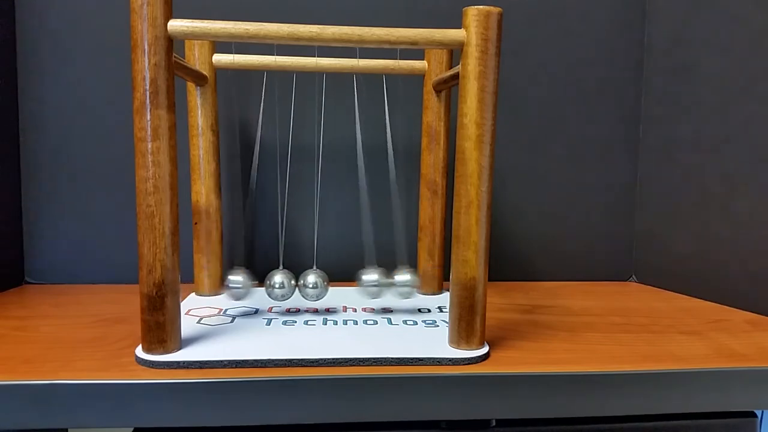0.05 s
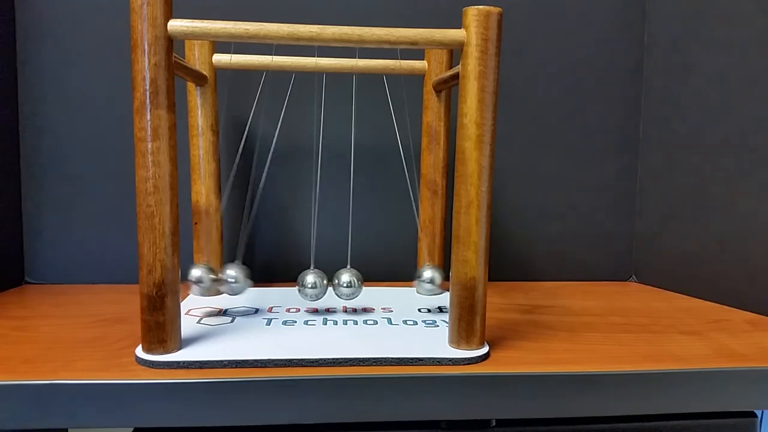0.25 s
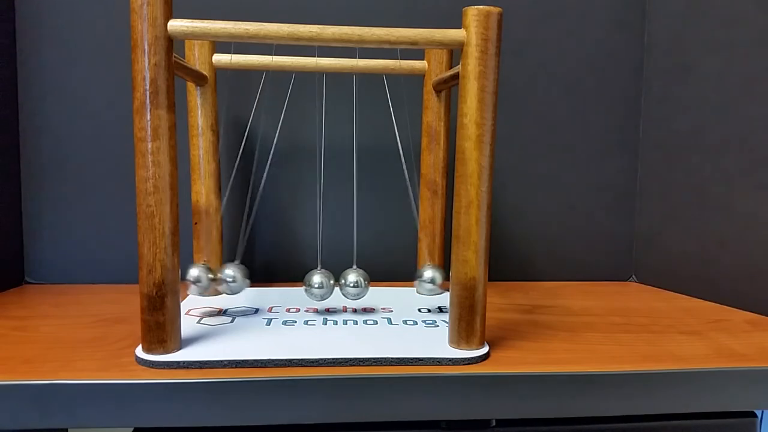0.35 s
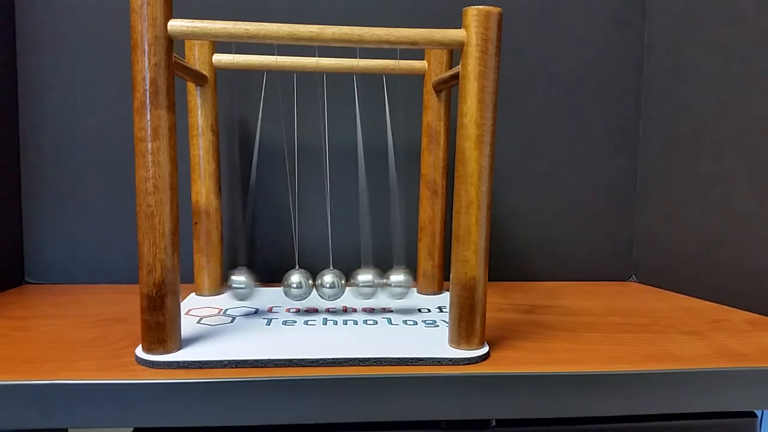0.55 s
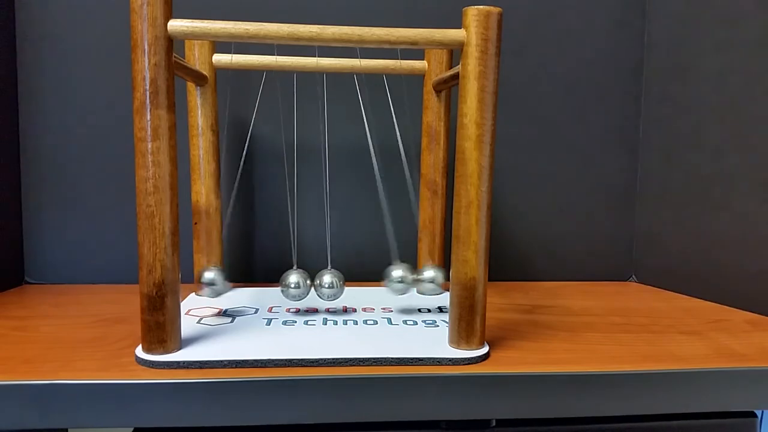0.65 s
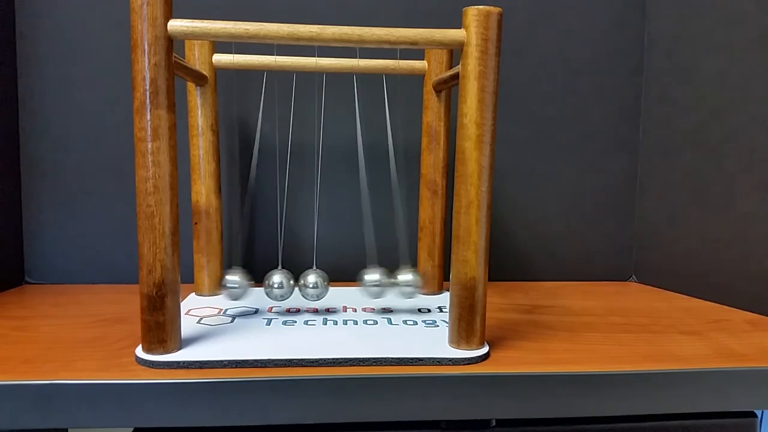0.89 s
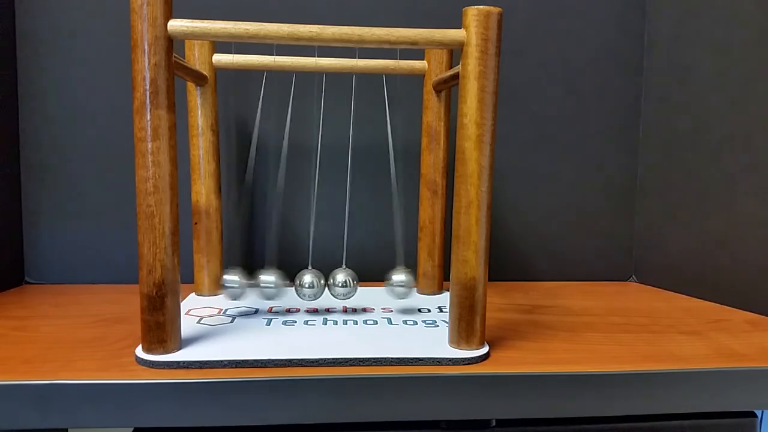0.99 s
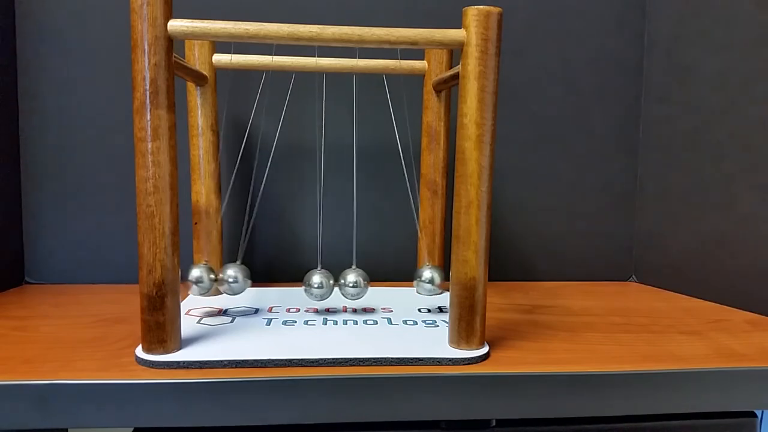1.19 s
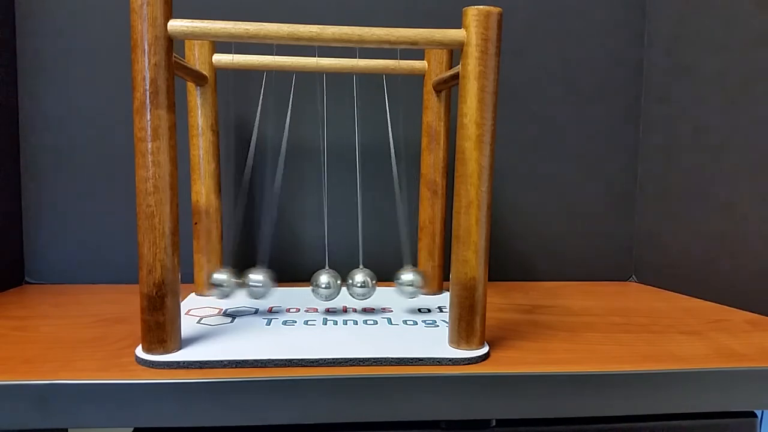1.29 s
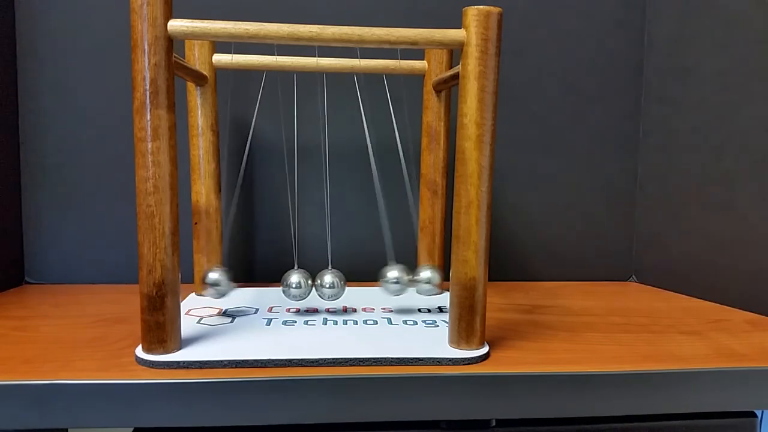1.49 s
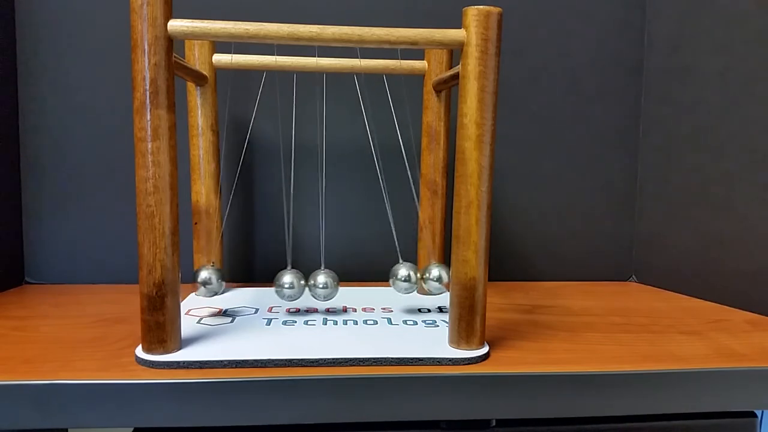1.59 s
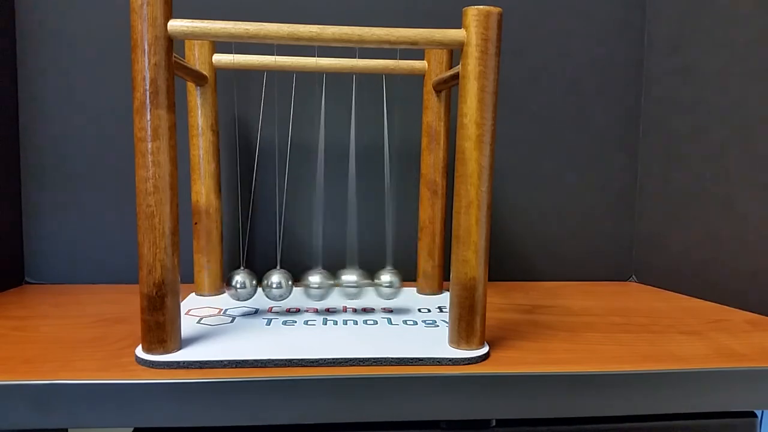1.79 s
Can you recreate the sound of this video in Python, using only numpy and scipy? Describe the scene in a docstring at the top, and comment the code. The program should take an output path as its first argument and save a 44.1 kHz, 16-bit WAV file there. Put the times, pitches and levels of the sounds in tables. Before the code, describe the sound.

A Newton's cradle swings on a desk, its steel balls making four regular bursts of three bright, briefly ringing clicks. The microphone is close, in a small room with short reverberation, a soft hum and slight hiss.

```python
"""A Newton's cradle swings on a desk in a small quiet room, heard close by over a low hum and faint hiss.
Its five steel balls are out of step: at 0.23 s come three quick clacks, each a few separate contacts.
Each contact sends out a sub-millisecond pulse, which balls and posts scatter and desk and frame reflect;
a brief ring and the room's short bright reverberation follow. Three more clacks come with every
half swing, about 0.42 s apart, the last group near 1.5 s."""
import sys
import numpy as np
from scipy import signal
from scipy.fft import rfft, irfft
from scipy.io import wavfile
from scipy.ndimage import uniform_filter1d

SR = 44100
rng = np.random.default_rng(int(sys.argv[2]) if len(sys.argv) > 2 else 0)


def generate_wav(signal):
    """Clip the signal to [-1, 1] and save it as 16-bit WAV at the path in sys.argv[1]."""
    frames = np.transpose(np.atleast_2d(signal))
    scaled = np.clip(frames, -1, 1) * 32767
    pcm = np.round(scaled).astype(np.int16)
    wavfile.write(sys.argv[1], SR, pcm)


N = 81585

CRADLE_GAIN_DB, TREBLE_EDGE_HZ, LEFT_LAG_MS = 9.5, 7050, 0.2474
SCATTER_GAIN_DB, SCATTER_T60_S, SCATTER_BUILD_S, SCATTER_LEAD_S = 2, 0.025, 0.00074, 0.001
ROOM_GAIN_DB, ROOM_T60_S, ROOM_TREBLE_T60_S, ROOM_BUILD_S = -3.5, 0.28, 0.25, 0.0032

# Ball-to-ball contacts: t/s, relative level/dB, treble gain/dB, room gain/dB
CONTACTS = [ (.228, -13, -4, -7), (0.2286, -12, -5.5, -8.5), (0.2535, -8, 1.5, 1), (.2542, -7.5, 1.5, 1.5),
            (0.2566, -15.5, -4, 2), (.2767, -10.5, 4, -1.5), (0.2776, -13, 1, -3.5), (0.2798, -14, 2, -4),
            (0.2806, -10.5, 1, -0.5), (0.6502, -11.5, -8, -6), (0.6528, -12.5, -6, -7),
            (0.6761, -13.5, 3, -4), (0.6762, -7.5, 2, -2.5), (0.6765, -9.5, 3.5, -3.5),
            (0.6994, -9.5, 2.5, 2), (0.7004, -11, 2, 1.5), (1.068, -13.5, -2.5, -5.5),
            (1.0717, -13.5, -8, -6), (1.0965, -8.5, 2, -0.5), (1.0985, -9, 1, -0.5), (1.1219, -11, 3, -0.5),
            (1.1243, -13.5, 1, -1), (1.1257, -11.5, 2.5, 0.5), (1.128, -13.5, 1, -0.5),
            (1.4896, -12.5, -7.5, -2.5), (1.4969, -11, -3.5, -4), (1.5191, -6.5, 2, -1),
            (1.521, -9, -1, -1.5), (1.5218, -12.5, -1, -3), (1.541, -12.5, 1, 0.5), (1.5458, -14.5, 4, 0),
            (1.5468, -10, 2, 1), (1.5508, -12, 1, 1.5)]
# Spectral envelope of a contact: f/Hz, left gain/dB, right gain/dB
CONTACT_SPECTRUM = [(300, -39, -41), (896, -28.5, -32.5), (1470, -28, -27), (1830, -19.5, -20.5),
                    (2280, -8.5, -7), (3320, -9.5, -7.5), (4010, -3.5, 0), (5760, -9, 3), (6580, -9, -5.5),
                    (7950, -9, -19), (10420, -11, -24), (15100, -27, -34)]
# Reflections from desk and frame: delay/ms, left gain/dB, right gain/dB
EARLY_REFLECTIONS = [(1.24, -25, -12), (1.66, -10, -5.5), (3.13, -9, -11)]
# Modes that ring after a contact: f/Hz, level relative to the pulse/dB, T60/s
RING_MODES = [(2350, -49, .03), (2990, -43, .06), (3550, -55, 0.056), (3935, -40, .03), (4193, -36.5, .04),
              (4800, -42.5, 0.022), (5380, -41, .025), (5700, -41.5, .04), (6270, -49, .05),
              (6840, -54, .04)]
# Spectral envelope of the reverberation: f/Hz, left gain/dB, right gain/dB
ROOM_SPECTRUM = [(400, -16, -26), (1496, -26, -21.5), (2380, -9.5, -6.5), (3400, -9.5, -7), (5200, -7.5, 1),
                 (6600, -9.5, -5), (8000, -6.5, -16), (9640, -5, -16), (12670, -13, -20),
                 (15500, -20.5, -25)]
# The two hum tones: f/Hz, offset from the envelope/dB, waver/dB
HUM_TONES = [(58.9, 0, 0.5), (186.6, -2.5, 1.5)]
# Envelope of the lower hum tone: t/s, level/dB
LOW_HUM_ENVELOPE = [(0.0, -65), (0.076, -53.5), (0.118, -59.5), (0.328, -55), (0.37, -60.5), (0.622, -49),
                    (1.086, -61), (1.102, -67), (1.158, -52), (1.23, -63), (1.308, -48), (1.386, -62),
                    (1.422, -51.5), (1.56, -56), (1.628, -49.5), (1.668, -64), (1.71, -49.5), (1.85, -51)]
# Envelope of the upper hum tone: t/s, level/dB
UPPER_HUM_ENVELOPE = [(0.0, -65.5), (0.406, -63.5), (0.53, -73), (0.596, -56), (0.736, -70), (0.942, -64),
                      (1.004, -85), (1.092, -63.5), (1.766, -57.5), (1.85, -69)]
# Spectral density of the ambient noise: f/Hz, left level/dB, right level/dB
AMBIENT_SPECTRUM = [(25, -79.5, -78), (42, -82, -81), (58, -77.5, -73.5), (75.2, -78, -74.5),
                    (96.4, -85, -82), (127.5, -80, -79.5), (158, -86, -84), (197, -82, -79.5),
                    (283, -89.5, -86), (503, -96, -90), (1154, -106, -94), (1547, -110, -104),
                    (1834, -107, -93), (2740, -110, -96), (3200, -115, -107), (3430, -115, -107),
                    (3950, -114, -93.5), (4700, -118, -96), (5640, -121, -108), (7000, -125, -119),
                    (10100, -123, -123), (15000, -118, -117)]


def cradle(size=4096):
    """Impact radiation: each contact emits a pulse that clacks, scatters and excites the room."""
    f = np.fft.rfftfreq(size, 1 / SR)
    pulses, scattered = np.zeros(N), np.zeros((2, N))
    for (onset, db, treble_db, _), spray in zip(CONTACTS, scattering()):
        start = int(onset * SR) - size // 8  # leaves space for the pulse's leading flank
        pulse = np.exp(-2j * np.pi * f * (onset - start / SR)) * undb(db + treble_db * treble_share(size))
        add(pulses, irfft(pulse), start)
        add(scattered, irfft(pulse * rfft(spray, size)), start - int(SCATTER_LEAD_S * SR))
    arrival = np.array([delay(LEFT_LAG_MS / 1000), delay(0)])
    clacks = irfft(rfft(pulses, 2 * N) * arrival * rfft(clack_response(), 2 * N))[:, :N]
    tail = reverberation(ROOM_T60_S, in_treble=False) + reverberation(ROOM_TREBLE_T60_S, in_treble=True)
    return undb(CRADLE_GAIN_DB) * (colour(clacks + scattered, CONTACT_SPECTRUM) + colour(tail, ROOM_SPECTRUM))


def clack_response():
    """Impulse response of a contact: direct path, image sources in desk and frame, and damped modes."""
    t = np.arange(N) / SR
    images = sum(undb([[left], [right]]) * delay(ms / 1000) for ms, left, right in EARLY_REFLECTIONS)
    ring = sum(undb(db) * np.cos(2 * np.pi * hz * t) * decay(t60) for hz, db, t60 in RING_MODES)
    return irfft(1 + images)[:, :N] + ring


def scattering(size=2048):
    """Multiple scattering among balls and posts: a new spray per contact, since the balls have moved."""
    envelope = decay(SCATTER_T60_S)[:size] * (1 - np.exp(-np.arange(size) / SR / SCATTER_BUILD_S))
    noise = rng.standard_normal((len(CONTACTS), 2, size))
    return undb(SCATTER_GAIN_DB) * noise * envelope / np.sqrt(np.sum(envelope ** 2))


def reverberation(t60, in_treble):
    """Diffuse field in one band: the contacts' energies add incoherently, build up and die away."""
    response = (decay(t60) * (1 - np.exp(-np.arange(N) / SR / ROOM_BUILD_S))) ** 2
    energy = np.zeros(2 * N)
    for onset, db, treble_db, room_db in CONTACTS:
        amplitude = undb(ROOM_GAIN_DB + db + room_db + in_treble * treble_db)
        add(energy, response / response.sum() * amplitude ** 2, int(onset * SR))
    band = treble_share(2 * N) if in_treble else 1 - treble_share(2 * N)
    noise = irfft(rfft(rng.standard_normal((2, 2 * N))) * np.sqrt(band))[:, :N]
    return noise * np.sqrt(energy[:N])


def hum():
    """Amplitude and phase modulation: two low tones swell and waver."""
    t = np.arange(N) / SR
    tones = np.zeros(N)
    for (hz, offset_db, waver_db), envelope in zip(HUM_TONES, (LOW_HUM_ENVELOPE, UPPER_HUM_ENVELOPE)):
        rms_db = np.interp(t, *np.array(envelope).T) + offset_db + waver_db * drift(8.95)
        phase = 2 * np.pi * hz * t + 0.72 * drift(5.85)
        tones += np.sqrt(2) * undb(rms_db) * np.sin(phase)
    return tones


def ambient_noise(coherent_below_hz=220, gain_db=-0.1, waver_db=0.635):
    """Spatial coherence: the low rumble is common to both sides, the faint hiss is independent."""
    coherence = 1 / (1 + (np.fft.rfftfreq(2 * N, 1 / SR) / coherent_below_hz) ** 2)
    independent = rfft(rng.standard_normal((2, 2 * N))) * np.sqrt(1 - coherence)
    common = rfft(rng.standard_normal(2 * N)) * np.sqrt(coherence)
    white = irfft(independent + common)[:, :N] * np.sqrt(SR / 2)  # unit power per hertz
    return colour(white, AMBIENT_SPECTRUM) * undb(gain_db + waver_db * drift(8.26))


def colour(x, table):
    """Linear filtering of each side by gains interpolated over log frequency."""
    hz, left, right = np.array(table, float).T
    log_f = np.log(np.maximum(np.fft.rfftfreq(2 * N, 1 / SR), 1))
    gain = undb([np.interp(log_f, np.log(hz), side) for side in (left, right)])
    return irfft(rfft(x, 2 * N) * gain)[:, :N]


def treble_share(size):
    """Crossover: the share of each frequency that counts as treble."""
    return 1 - 1 / (1 + (np.fft.rfftfreq(size, 1 / SR) / TREBLE_EDGE_HZ) ** 6)


def delay(seconds):
    """Shift theorem: a delay is a phase lag proportional to frequency."""
    return np.exp(-2j * np.pi * np.fft.rfftfreq(2 * N, 1 / SR) * seconds)


def decay(t60):
    """Exponential damping, 60 dB in t60 seconds."""
    return np.exp(-np.log(1000) * np.arange(N) / SR / t60)


def drift(rate_hz):
    """Smoothed random steps: a slow fluctuation with a spread near 1."""
    step = int(SR / rate_hz)
    return uniform_filter1d(np.repeat(rng.standard_normal(N // step + 1), step), step)[:N]


def undb(db):
    """Decibels to amplitude ratio."""
    return 10 ** (np.asarray(db) / 20)


def add(track, sound, start):
    """Superpose a sound on a track from a given sample."""
    track[..., start:start + sound.shape[-1]] += sound


def scene():
    """Superposition: the pressures of cradle, ambient noise and hum add."""
    return cradle() + ambient_noise() + hum()


def record(dry, cutoff_hz=15750):
    """Band limiting: a steep low-pass filter removes the top of the treble."""
    return signal.sosfilt(signal.ellip(8, .2, 80, cutoff_hz, fs=SR, output="sos"), dry)


dry = scene()
out = record(dry)
generate_wav(out)
```